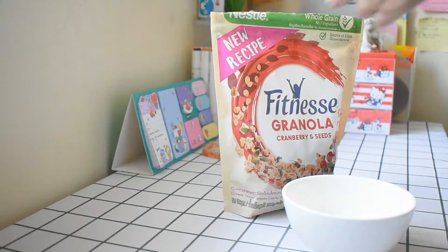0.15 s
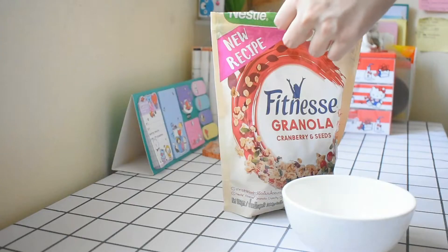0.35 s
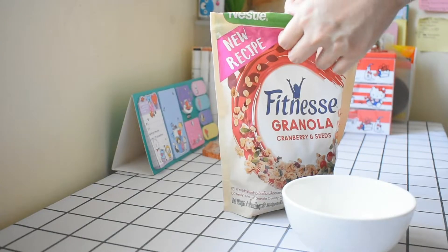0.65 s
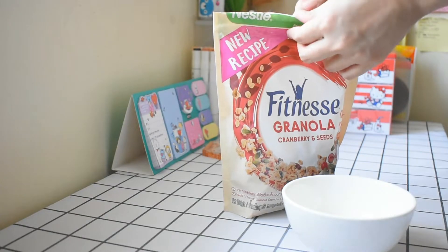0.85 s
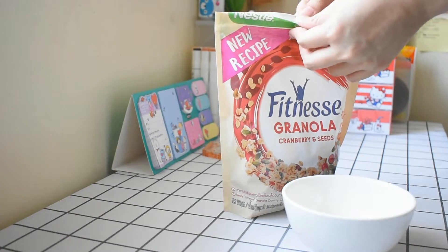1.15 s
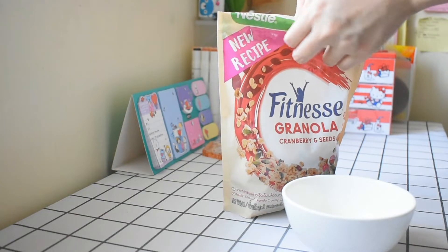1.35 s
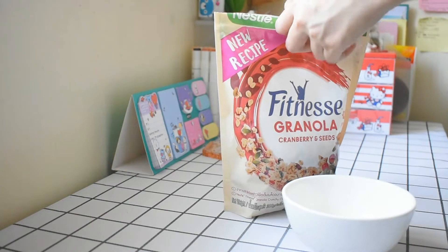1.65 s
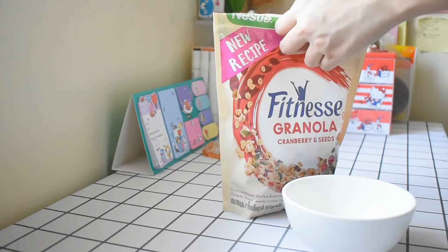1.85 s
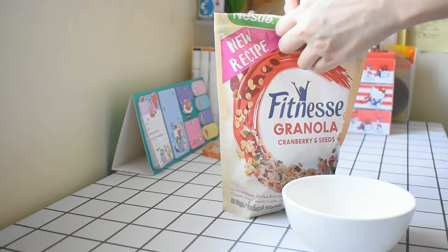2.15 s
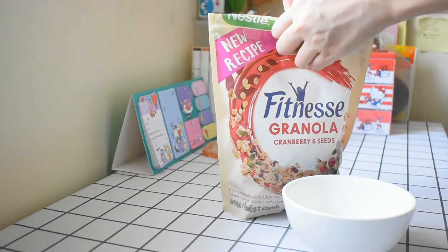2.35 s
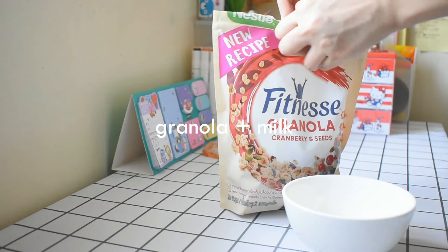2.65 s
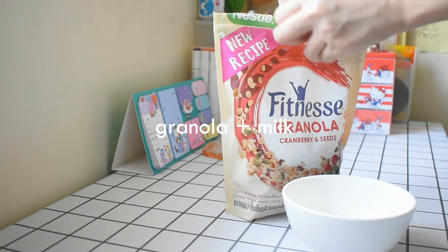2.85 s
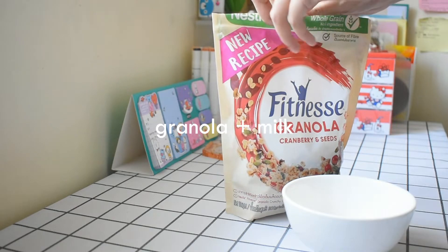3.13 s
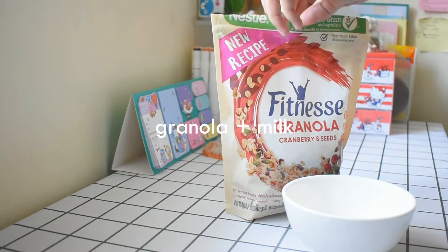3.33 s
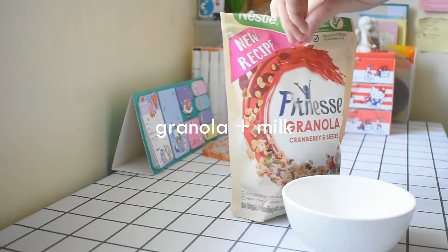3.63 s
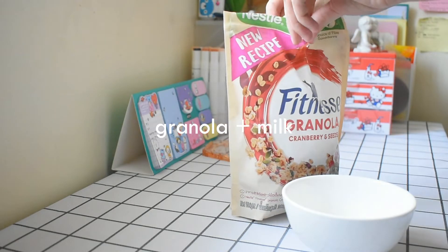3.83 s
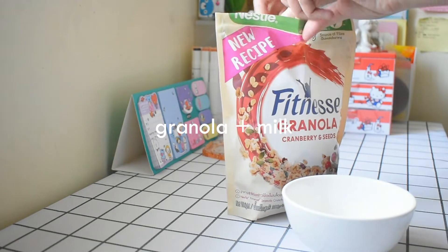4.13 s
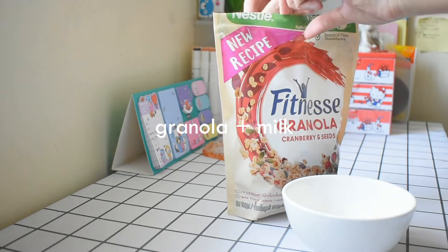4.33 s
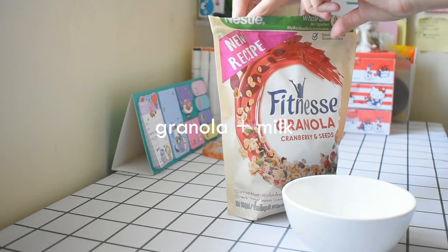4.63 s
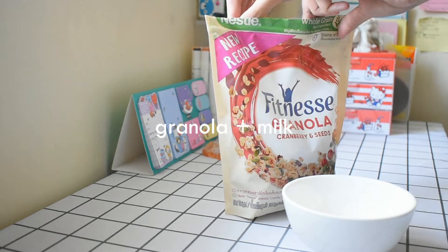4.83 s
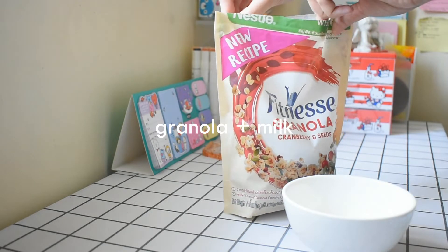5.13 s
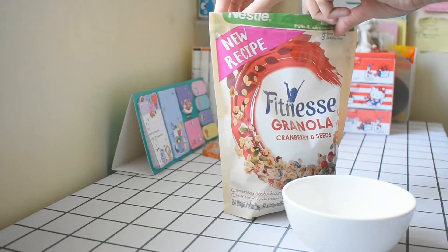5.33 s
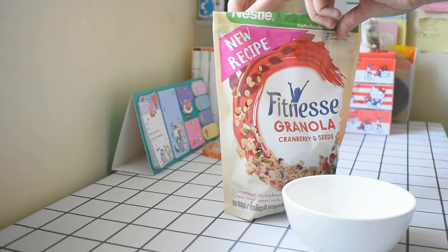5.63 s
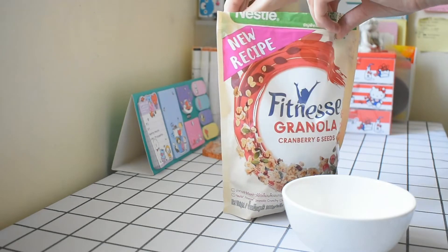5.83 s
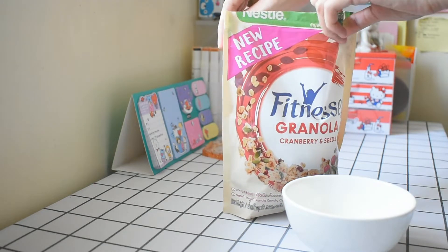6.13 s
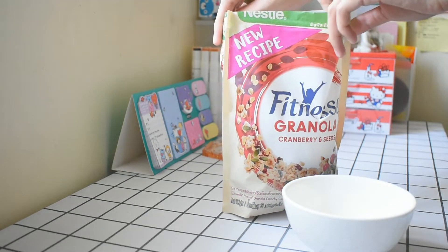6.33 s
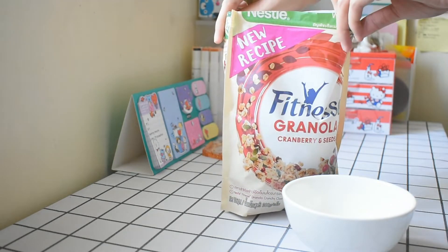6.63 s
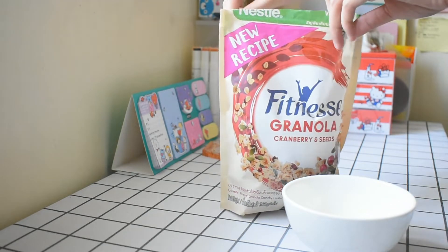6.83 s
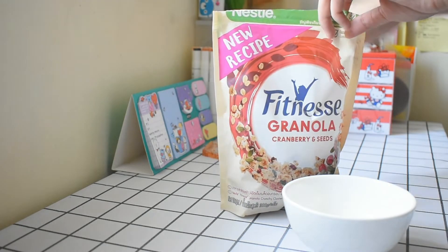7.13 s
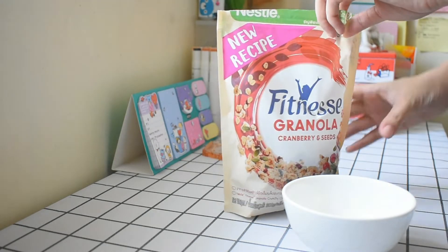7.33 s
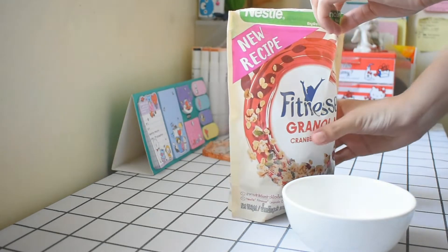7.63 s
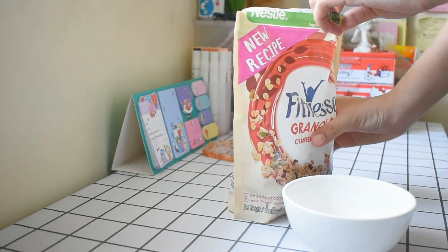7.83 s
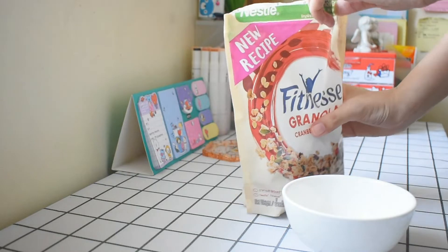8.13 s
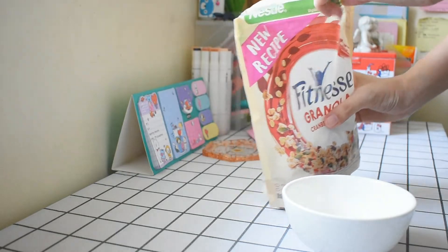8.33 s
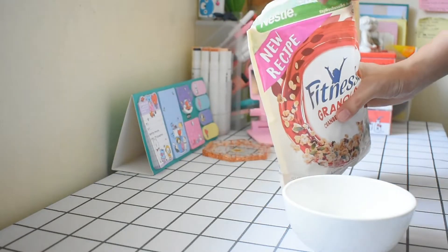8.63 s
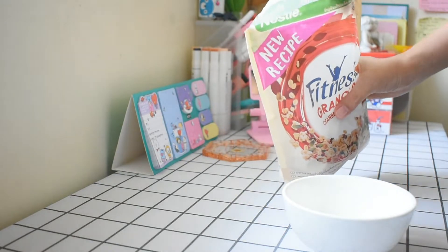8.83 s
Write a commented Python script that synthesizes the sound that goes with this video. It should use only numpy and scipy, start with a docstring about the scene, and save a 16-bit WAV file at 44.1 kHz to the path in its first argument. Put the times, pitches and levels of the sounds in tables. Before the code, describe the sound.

A quiet, steady hush in a small bare room with a short ring. Around 0.2-0.5 s fingers glide faintly over stiff plastic; from 0.6 s soft single snaps begin, growing into firmer crackles at 1.4-1.9 s with dull granola stirring inside. At about 2.36 s a quick cluster of loud, low knocks and scrapes bumps the microphone directly, with a smaller one at 2.43. At 2.6 s a bright, hard tear bursts out. Moderate crinkles follow, dense between 3.5 and 4.1 s, then looser until 4.7. A rapid ripping flurry at 4.75-5.15 s peaks in a sharp pop near 4.96. After a near pause, crisp creasing resumes at 5.8-6.5 s as the mouth is spread. It thins to about 7.4, then scattered snaps and muffled cluster knocks accompany gripping and lifting until 8.7 s, ending with a faint tick near 9.

```python
"""Fingers slide on a stiff plastic pouch of granola and grip its top, and the film buckles in single snaps.
A quick cluster of knocks bumps the microphone; then the hand tears the top, works the zip seal open,
spreads the mouth and lifts the pouch off the table. Snaps are noise bursts ringing through film modes;
runs of tiny noise grains make the ripping, the creasing and the granola shifting inside.
A small bare room rings after the pouch, and a steady hush lies under everything."""
import sys
import numpy as np
from scipy import signal
from scipy.fft import rfft, irfft, next_fast_len
from scipy.io import wavfile
from scipy.ndimage import uniform_filter1d

SR = 44100
rng = np.random.default_rng(int(sys.argv[2]) if len(sys.argv) > 2 else 0)


def to_wav(s):
    """Save 16-bit WAV."""
    ch = np.atleast_2d(s).T  # columns
    pcm = np.round(np.clip(ch, -1, 1) * 32767)  # PCM
    wavfile.write(sys.argv[1], SR, pcm.astype(np.int16))


N = 396018

# The film buckles. Each row: start in seconds, level of the crack in dB, treble in dB relative to the crack,
# ring of the film in Hz, time in seconds for the crack to fade by 60 dB.
FILM_SNAPS = [(.567,-38.5,0,4400,0.012),(.673,-48.5,11,6250,0.029),(.764,-50,-27,1350,.04),(.83,-44.5,-7.5,4700,.03),(0.868,-35.5,-4.5,3200,0.026),(.979,-39,-15,4350,0.016),
              (1.024,-37,-17,1980,.036),(1.06,-42.5,-37,1300,0.032),(1.119,-36.5,0,4250,.036),(1.167,-37,-1,2100,0.055),(1.19,-36.5,-3,3150,0.037),(1.238,-34,-10,2100,.015),
              (1.31,-35,-28,1270,.035),(1.382,-40,-18,1700,0.036),(1.4,-25,-22,1760,0.05),(1.49,-32.5,-19,2830,0.088),(1.56,-35.5,-18.5,1220,0.062),(1.608,-35.5,-12,5400,.032),(1.628,-30.5,-10,3270,0.028),
              (1.693,-24,-8,3250,0.066),(1.726,-20,-2.5,1400,0.039),(1.836,-37,-3,2240,0.043),(1.871,-29,-18,3400,0.012),
              (2.003,-37,-20,1290,0.031),(2.017,-34,-4,5030,0.024),(2.027,-33,-12,4030,0.029),(2.143,-37,-19,3500,0.035),(2.224,-42,-26,1570,0.022),(2.256,-42.5,-37,1430,0.042),(2.304,-37.5,-12,2280,0.033),(2.479,-37.5,-5,4730,0.09),
              (2.565,-42,-26,1800,0.056),(2.597,-35,1.5,4900,.018),(2.603,-17,-6,3250,.1),(2.608,-22.5,2.5,3230,0.066),(2.619,-14.5,0.5,4800,0.055),(2.638,-15,-5,3240,0.1),(2.668,-19.5,4,7300,.032),(2.779,-31,3,3100,0.0077),(2.798,-23.5,-9,3070,0.024),(2.82,-30,-5,3170,0.025),
              (3.042,-29.5,-16,2750,0.028),(3.101,-32.5,-19,2780,0.017),(3.134,-33,-8,3740,0.053),(3.237,-39.5,-17,1900,0.038),(3.269,-28.5,-3.5,3320,0.039),(3.392,-39,-18,2860,.036),(3.431,-31.5,-6.5,3270,0.025),(3.521,-37.5,-15,3100,0.042),(3.545,-23.5,-2.5,5170,0.1),
              (3.683,-33,-15,2900,.045),(3.695,-30.5,-4.5,2200,0.064),(3.73,-22.5,-6,3500,0.086),(3.748,-25,-3,5040,0.025),(3.775,-26.5,4,4800,.02),(3.805,-53,-10,2650,.028),(3.833,-23.5,-7,2670,0.013),(3.858,-21,-9.5,2960,0.04),(3.877,-31,3.5,2500,0.018),
              (3.912,-23.5,-5.5,2800,0.0048),(3.947,-20,-.5,4740,0.029),(3.986,-23,-16,3000,0.012),(4.016,-29.5,-2,2600,0.022),(4.057,-31.5,-11,2200,0.019),(4.149,-35,-16,1370,0.02),(4.17,-35,-30,1450,.034),
              (4.293,-31.5,-25,2410,0.091),(4.35,-37.5,-15,2500,0.031),(4.441,-32.5,-15,1130,0.086),(4.521,-31.5,-25,2840,0.015),(4.573,-24,-3.5,4300,0.041),(4.588,-31,-0.5,6200,0.014),(4.679,-42,-15.5,2900,.026),(4.704,-26,-19,2850,0.049),(4.749,-31,-8.5,5700,0.036),(4.756,-22,0.5,5300,0.029),
              (4.828,-28,0.5,3200,0.013),(4.871,-36,8,3400,0.0083),(4.891,-35,8,4760,0.042),(4.906,-37,8,4360,.03),(4.914,-20,-0.5,2250,0.041),(4.939,-26,-2,2250,.05),(4.952,-33,0,3000,.05),(4.964,-11,-7.5,2990,0.037),(5.007,-23,-16,2520,.023),
              (5.024,-26,-8,7450,0.018),(5.029,-32,10.5,7600,.012),(5.044,-26,-2,2300,0.023),(5.073,-36,5,6500,0.017),(5.087,-20,3.5,3300,0.015),(5.122,-27,-24,2430,0.035),(5.154,-33.5,1.5,2200,0.021),(5.496,-32.5,-14.5,2430,0.03),
              (5.563,-45,-13,4300,.022),(5.775,-31,-2,5100,0.02),(5.794,-31.5,-5,2250,0.021),(5.823,-28,-14,2340,0.028),(5.84,-33.5,-1,2140,0.018),(5.865,-21.5,-4,1850,0.025),(5.915,-24,-13,1950,0.024),(5.921,-21.5,-0.5,1860,0.013),(5.978,-23,-1.5,1960,0.024),(5.993,-27,-16,2080,.018),
              (6.047,-27,-3,2090,0.033),(6.075,-25.5,-1,5030,0.028),(6.096,-25,-1.5,2090,0.076),(6.124,-22.5,-1,3700,0.11),(6.183,-29,-1.5,2700,.025),(6.213,-27.5,-3.5,2270,0.021),(6.249,-36,7,5060,0.022),
              (6.26,-15,-5.5,1150,0.045),(6.289,-23.5,5,5100,0.019),(6.327,-42.5,12,5300,0.02),(6.355,-24.5,4.5,4140,0.026),(6.374,-25,-1,1690,0.021),(6.407,-33,0,1790,0.026),(6.448,-33.5,0,4650,0.012),(6.471,-25.5,-20,3720,0.077),(6.481,-30.5,-6,5700,.04),
              (6.829,-40,-33,1870,0.033),(6.867,-33,0.5,2250,0.11),(6.907,-46,11,4160,0.027),(6.942,-33.5,-20,1800,0.025),(6.965,-33,1,6500,.021),(7.1168,-29,-13,2000,0.021),(7.168,-37,-21,1180,.024),(7.272,-36,-25,1870,0.038),(7.368,-44.5,-21,1900,0.069),
              (7.444,-28.5,-16,1920,0.044),(7.477,-27,-5.5,4200,0.045),(7.546,-36.5,-23,2000,0.054),(7.563,-20.5,-1.5,4630,.045),(7.598,-28,-22,2660,0.041),(7.656,-32.5,-3.5,5100,0.013),(7.701,-36,-4,4800,.034),
              (7.829,-26,-14,1240,0.081),(7.87,-29.5,-12,2270,.036),(7.966,-38.5,-22,1370,0.026),(8.124,-23,-6.5,3300,0.01),(8.153,-30,-6,4800,0.067),(8.179,-33.5,-6,1710,0.038),(8.215,-47,-8,1800,.035),(8.251,-35,-14,1690,.045),(8.269,-32,-7,1850,.045),
              (8.345,-21.5,-1.5,4400,0.032),(8.378,-34,-10,4400,.035),(8.386,-18,-.5,3230,0.026),(8.433,-36,10.5,5000,0.0087),(8.49,-18,-10,3970,.03),(8.573,-22.5,0,5100,0.018),(8.631,-30.5,-9,2660,.028),(8.711,-33.5,-10,1830,0.046),(8.96,-36.5,-32,1750,0.24)]
# Tone of the pouch's wall when it booms or is knocked. Each row: frequency in Hz, relative level in dB.
WALL_TONE = [(30, -28), (80, -26.5), (160, -10), (260, -2.5), (420, 4.5), (750, 3), (1200, -1.5),
             (1800, -6.5), (4000, -45)]
# Tone of tiny creases in the plastic. Each row: frequency in Hz, relative level in dB.
CREASE_TONE = [(100, -44.5), (400, -8), (1200, -1), (2500, 3), (4800, 3), (7000, -2.5), (10500, -6.5),
               (16000, -17)]

ORDINARY_DB, ORDINARY_TREBLE_DB = -31, -7  # an ordinary snap: its level, and its treble relative to that
LEVEL_SPAN_S = 0.008  # a level in dB for a snap or drop is its energy spread over this many seconds


def amp(db):
    """Turn decibels into gain."""
    return 10 ** (np.asarray(db) / 20)


def unit(x):
    """Scale to an rms of 1."""
    return x / np.sqrt(np.mean(x ** 2) + 1e-20)


def along(points, hz):
    """Read a value off a curve of (Hz, value) points, on a log frequency axis."""
    f, values = np.transpose(points)
    return np.interp(np.log(hz + 1), np.log(f + 1), values)


def add(track, s, sound):
    """Mix a sound into a track at a time in seconds."""
    part = track[max(0, round(s * SR)):][:len(sound)]
    part += sound[:len(part)]


def filtered(x, response):
    """Multiply the spectrum of x by a response, given as a function of frequency."""
    n = x.shape[-1]
    padded = next_fast_len(n + min(n, SR // 4))
    spectrum = rfft(x, padded) * response(np.fft.rfftfreq(padded, 1 / SR))
    return irfft(spectrum, padded)[..., :n]


def coloured(x, tone, size=2048):
    """Give x a tone with a filter that never acts ahead of time, so attacks stay sharp."""
    # Folding the cepstrum forward in time gives a minimum-phase filter.
    cepstrum = irfft(np.log(amp(along(tone, np.fft.rfftfreq(size, 1 / SR)))))
    cepstrum[1:size // 2] *= 2
    cepstrum[size // 2 + 1:] = 0
    kernel = irfft(np.exp(rfft(cepstrum)))
    if x.ndim > 1:
        kernel = kernel[None]
    return signal.fftconvolve(x, kernel, axes=-1)[..., :x.shape[-1]]


def resonance(f, hz, q):
    """Response of one vibrating mode, with gain 1 at its centre; a higher q is narrower."""
    return 1j * f * hz / q / (hz * hz - f * f + 1j * f * hz / q)


def fade(t, t60):
    """Exponential decay by 60 dB in t60 seconds."""
    return np.exp(-np.log(1000) * t / np.maximum(t60, 1e-4))


def stroke(length, edge):
    """A smooth rise, hold and fall; edge is the share spent rising and falling."""
    return signal.windows.tukey(max(8, int(length * SR)), edge)


def grains(rate, spread_db, t60):
    """Tiny noise bursts of random size at random times, about rate of them a second."""
    happens = rng.random(N) < rate / SR
    sizes = amp(spread_db * np.clip(rng.standard_normal(N), -2, 2)) * happens
    power = signal.fftconvolve(sizes ** 2, fade(np.arange(SR // 10) / SR, t60) ** 2)[:N]
    return np.sqrt(abs(power)) * rng.standard_normal(N)


def snaps(ring_gain=1.93, overtone_gain=0.27, overtone_ratio=2.17, ring_q=10.7, panel_hz=744.0, panel_gain=3.5):
    """Each buckle cracks, rings its own facet of film and shakes the whole panel; strong and dull ones boom more."""
    # Tones of the crack and of its treble. Each row: frequency in Hz, relative level in dB.
    crack_tone = [(400, -30.5), (900, -9.5), (1400, -3.5), (2500, -1), (4500, -7), (6000, -12.5),
                  (12000, -42.5)]
    treble_tone = [(2500, -42), (4200, -1.5), (5400, 0.5), (8000, 0.5), (10500, -2), (13000, -8.5),
                   (16000, -17.5)]
    attack_s, spike_t60 = 0.00076, 0.0057  # a buckle builds up, then its first spike dies
    s, db, treble_rel, facet_hz, t60 = np.transpose(FILM_SNAPS)[:, :, None]
    force = db - ORDINARY_DB
    dullness = ORDINARY_TREBLE_DB - treble_rel
    boom_db = -45 + 0.85 * force + 0.06 * dullness
    t = np.arange(SR // 14) / SR  # every burst stops at this length
    bent_hz = panel_hz * np.exp(0.408 * rng.standard_normal(s.shape))  # a new panel pitch at each snap

    def facet(f):
        """A small facet of film rings at its own pitch and at one overtone."""
        first = ring_gain * resonance(f, facet_hz, ring_q)
        return 1 + first + overtone_gain * resonance(f, overtone_ratio * facet_hz, ring_q)

    def tilted_facet(f):
        """The facet, with its crack tilted upward in frequency when the snap has little treble."""
        return facet(f) * amp(0.1 * dullness * np.log2(1 + f / panel_hz))

    def panel(f):
        """The whole bent panel vibrates in one mode."""
        return 1 + panel_gain * resonance(f, bent_hz, ring_q)

    def burst(life, tone, level_db, body, spike):
        """One band of every snap: a sharp spike, then a short flutter through the body's modes."""
        since = np.maximum(t - attack_s, 0)
        attack = np.minimum(t / attack_s, 1) ** 2
        envelope = attack * (fade(since, life) + spike * fade(since, spike_t60))
        noise = rng.standard_normal((len(s), len(t))) * envelope
        y = coloured(filtered(noise, body), tone)
        return amp(level_db) * y * np.sqrt(LEVEL_SPAN_S * SR / np.sum(y ** 2, axis=1, keepdims=True))

    sounds = burst(t60, crack_tone, db, tilted_facet, spike=0.11)
    sounds += burst(t60 * 0.94, treble_tone, db + treble_rel, facet, spike=1.03)
    sounds += burst(0.065, WALL_TONE, boom_db, panel, spike=0.08)
    track = np.zeros(N)
    for when, sound in zip(s[:, 0], sounds):
        add(track, when, sound)
    return track


def rips():
    """The seal and its rim give way in dense runs: hundreds of tiny releases a second as the plastic is pulled."""
    # Each row: start in seconds, length in seconds, level in dB.
    runs = [(2.587, 0.064, -19.5), (2.66, 0.027, -20), (4.871, 0.11, -26.5), (4.934, 0.08, -22.5),
            (4.985, 0.038, -32.5), (6.245, 0.044, -44), (6.354, 0.043, -29.5)]
    pull = np.zeros(N)
    for s, length, db in runs:
        add(pull, s, amp(db) * stroke(length, 0.65))
    return pull * unit(coloured(grains(rate=800, spread_db=2.5, t60=0.0015), CREASE_TONE))


def rustle():
    """Around each snap and while the hand moves, small creases tick in the film and clusters tumble dully inside."""
    # Larger moves of the hand: gripping the top, tearing it, working the seal open, spreading the mouth, lifting.
    # Each row: start in seconds, length in seconds, level of shifting granola in dB, level of fine creasing in dB.
    moves = [(0.756, 0.045, -47.5, -65), (0.998, 0.21, -64, -58.5), (1.288, .15, -48, -72),
             (1.534, 0.27, -40.5, -55), (1.786, 0.12, -58, -55), (2.222, .3, -47.5, -60),
             (2.554, 0.028, -40, -59), (2.693, 0.14, -46, -43), (3.654, 0.42, -41.5, -43),
             (4.11, 0.56, -47.5, -61), (4.736, 0.15, -49, -38.5), (5.47, 0.204, -64, -64),
             (5.848, 0.376, -56, -51), (6.231, 0.3, -42.5, -35), (6.824, 0.23, -52, -48.5),
             (7.549, 0.13, -40.5, -35.5), (7.823, 0.11, -38.5, -64), (8.136, 0.19, -39, -44),
             (8.324, 0.27, -39, -45), (8.56, 0.27, -52, -67)]
    # Tone of tumbling granola. Each row: frequency in Hz, relative level in dB.
    granola_tone = [(60, -54), (170, -11), (280, 1), (420, 8), (800, 6), (1500, 7), (3000, 1.5),
                    (6000, -11.5), (14000, -49)]
    lead_s, stir_s = 0.045, 0.11  # the stir starts ahead of its snap and lasts this long
    stir = np.zeros(N)
    for s, db, *_ in FILM_SNAPS:
        strength = amp(0.61 * (db - ORDINARY_DB))  # 0.61 dB more stir per dB of snap
        add(stir, s - lead_s, (strength * stroke(stir_s, 0.23)) ** 2)
    # These are powers, so that overlapping moves add up as noise does.
    shifting = amp(-57.5) ** 2 * stir
    creasing = amp(-64.5) ** 2 * stir
    for s, length, granola_db, crease_db in moves:
        add(shifting, s, (amp(granola_db) * stroke(length, 0.18)) ** 2)
        add(creasing, s, (amp(crease_db) * stroke(length, 0.16)) ** 2)
    creases = unit(coloured(grains(rate=130, spread_db=5.5, t60=0.006), CREASE_TONE))
    clusters = unit(coloured(grains(rate=120, spread_db=5, t60=0.02), granola_tone))
    return np.sqrt(creasing) * creases + np.sqrt(shifting) * clusters


def drops(wall_hz=1008.0, wall_gain=1.0, wall_q=4.0, spread=0.37, t60=0.055, rise_s=0.0011):
    """A falling cluster crumbles for a moment and knocks the slack wall, at a new pitch each time."""
    # Each row: start in seconds, level in dB.
    falls = [(.765,-43),(1.061,-42.5),(1.311,-40.5),(1.414,-38),(1.561,-39),(1.655,-44),(2.254,-36.5),(3.522,-42),(3.685,-33),(4.133,-41),(4.332,-41),(4.372,-48),(4.442,-34),(4.467,-41),
             (5.255,-43),(5.452,-47),(5.668,-48),(6.621,-39.5),(6.741,-43.5),(6.777,-39.5),(6.83,-42.5),(7.597,-32.5),(7.829,-30),(7.968,-39),(8.179,-37),(8.711,-39)]
    t = np.arange(SR // 10) / SR
    track = np.zeros(N)
    for s, db in falls:
        hz = wall_hz * np.exp(spread * rng.standard_normal())
        crumble = rng.standard_normal(len(t)) * fade(t, t60) * (1 - np.exp(-t / rise_s))
        ringing = filtered(crumble, lambda f: 1 + wall_gain * resonance(f, hz, wall_q))
        knock = coloured(ringing, WALL_TONE)
        add(track, s, amp(db) * knock * np.sqrt(LEVEL_SPAN_S * SR / np.sum(knock ** 2)))
    return track


def slides():
    """Skin gliding on the film gives a faint narrow hiss."""
    # Each row: start in seconds, length in seconds, pitch of the hiss in Hz, level in dB.
    glides = [(0.22, 0.098, 4460, -61), (0.312, 0.15, 3470, -59.5), (5.461, 0.15, 5100, -58.5),
              (8.024, 0.2, 4660, -50)]
    track = np.zeros(N)
    for s, length, hz, db in glides:
        swell = stroke(length, 0.53)
        hiss = filtered(rng.standard_normal(len(swell)), lambda f: resonance(f, hz, 2.9) ** 2)
        add(track, s, amp(db) * swell * unit(hiss))
    return track


def puffs(air_hz=70.0, rise_s=0.0022):
    """The pouch's walls spring apart and push air: a soft, low, quickly fading tone."""
    # Each row: start in seconds, gain in dB.
    pushes = [(2.62, -60), (4.965, -62), (5.087, -45)]
    t = np.arange(SR // 8) / SR
    push = np.sin(2 * np.pi * air_hz * t) * fade(t, 0.039) * (1 - np.exp(-t / rise_s))
    track = np.zeros(N)
    for s, db in pushes:
        add(track, s, amp(db) * push)
    return track


def bump(thump_hz=85, sway_hz=45):
    """Knocks travel through the microphone's housing as thump, ring and scrape, with no room on them."""
    # Knocks. Each row: start in seconds, then the gains in dB of the thump, the housing's ring and the scrape.
    knocks = [(2.3572, -19, -27, -14), (2.3626, -7, -5, -1.5), (2.3741, -19, -12, -22),
              (2.4348, -21.5, -27, -5), (2.503, -35, -30, -34)]
    # The microphone sways. Each row: time in seconds, level of the rumble in dB.
    sway = [(2.29, -55), (2.32, -44), (2.37, -28), (2.42, -38), (2.5, -32.5), (2.513, -92)]
    # The housing rings. Each row: frequency in Hz, relative level in dB, time in seconds to fade by 60 dB.
    housing = [(830, -24, 0.09), (1000, -13, 0.052), (1084, -8, 0.031), (1250, -31, 0.025)]
    # Tone of the scrape. Each row: frequency in Hz, relative level in dB.
    scrape_tone = [(200, -27), (500, -10), (1100, -5), (1900, -10), (3200, 2), (5000, -5), (7500, -1.5),
                   (11000, -2.5), (16000, -2)]
    seconds = np.arange(N) / SR
    rumble = filtered(rng.standard_normal(N), lambda f: resonance(f, sway_hz, 0.8) ** 2)
    swaying = (seconds > sway[0][0]) & (seconds < sway[-1][0])
    track = swaying * amp(np.interp(seconds, *np.transpose(sway))) * unit(rumble)

    t = np.arange(SR // 10) / SR
    thump = -np.sin(2 * np.pi * thump_hz * t) * fade(t, 0.051) * (1 - np.exp(-t / 0.003))
    ring = sum(amp(db) * np.sin(2 * np.pi * hz * t) * fade(t, t60) for hz, db, t60 in housing)
    for s, thump_db, ring_db, scrape_db in knocks:
        rub = rng.standard_normal(len(t)) * fade(t, 0.016) * (1 - np.exp(-t / 0.002))
        scrape = coloured(rub, scrape_tone)
        add(track, s, amp(thump_db) * thump + amp(ring_db) * ring + amp(scrape_db) * scrape)
    return track


def room(x, wet_db, modal_hz=1300.0, modal_t60=0.52, size=256):
    """Near walls echo; low notes ring on in a fixed noise tail, the treble lingers as a diffuse wash."""
    # Tone of the room. Each row: frequency in Hz, gain in dB.
    room_tone = [(60, -3), (160, 5.5), (270, -1), (450, 0), (1100, 0), (2500, -2.5), (6000, -3.5),
                 (10000, -3.5), (16000, -9)]
    # Decay of the wash. Each row: frequency in Hz, time in seconds to fade by 60 dB.
    decay = [(150, 0.85), (600, 0.45), (2000, 0.4), (4500, 0.34), (9000, 0.25), (16000, 0.22)]
    # Early echoes, ahead of the room's tone. Each row: delay in seconds, plain gain.
    walls = [(.0046, 0.019), (.0092, 0.13), (0.0171, .11), (0.0217, 0.12)]
    hz, _, frames = signal.stft(x, SR, nperseg=size)
    fed = abs(uniform_filter1d(abs(frames) ** 2, 3, axis=0))  # energy, blurred over 3 neighbouring bands
    kept = fade(size / 2 / SR, along(decay, hz)) ** 2  # share of the energy that survives a frame
    stored = np.array([signal.lfilter([0, 1 - k], [1, -k], band) for k, band in zip(kept, fed)])
    field = signal.stft(rng.standard_normal(N), SR, nperseg=size)[2]
    wash = signal.istft(np.sqrt(stored) * field / np.std(field), SR, nperseg=size)[1][:N]

    tail = rng.standard_normal(SR) * fade(np.arange(SR) / SR, modal_t60)
    modes = signal.fftconvolve(x, tail / np.linalg.norm(tail))[:N]

    def low(f):
        """Share of the energy held by the low modes."""
        return 1 / (1 + (f / modal_hz) ** 2)

    low_part = filtered(modes, lambda f: np.sqrt(low(f)))
    high_part = filtered(wash, lambda f: np.sqrt(1 - low(f)))
    wet = amp(wet_db) * (low_part + high_part)
    for delay, gain in walls:
        add(wet, delay, gain * x)
    return coloured(wet, room_tone)


def hush(level_db):
    """The steady background is plain noise given a soft tone."""
    # Each row: frequency in Hz, relative level in dB.
    quiet_tone = [(25, -29), (70, -28), (150, -9), (400, -5), (1000, -5), (2000, -5.5), (4000, -7.5),
                  (8000, -15.5), (12000, -20.5), (16000, -30)]
    return amp(level_db) * unit(coloured(rng.standard_normal(N), quiet_tone))


def scene():
    """The pouch in its room, the bump and the steady background hush."""
    pouch = snaps() + drops() + rustle() + rips() + slides() + puffs()
    return (pouch + room(pouch, wet_db=-3.5) + bump() + hush(level_db=-57.0))[None]


def record(dry):
    """The sharpest peaks clip at full scale, then the top of the treble is cut off."""
    top_hz, edge_hz = 16050, 400  # middle and width of the slope down to silence
    return filtered(np.clip(dry, -1, 1), lambda hz: np.clip((top_hz - hz) / edge_hz + 0.5, 0, 1))


dry = scene()
out = record(dry)
to_wav(out)
```